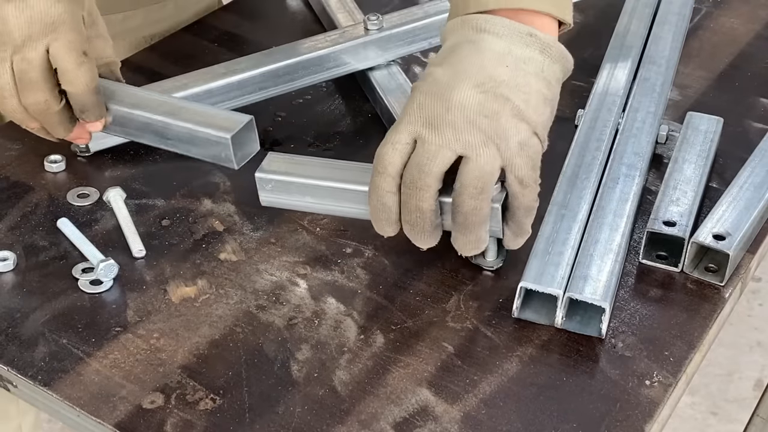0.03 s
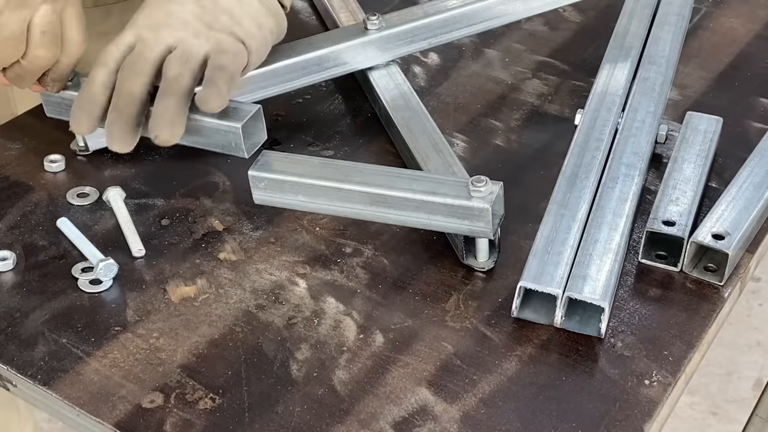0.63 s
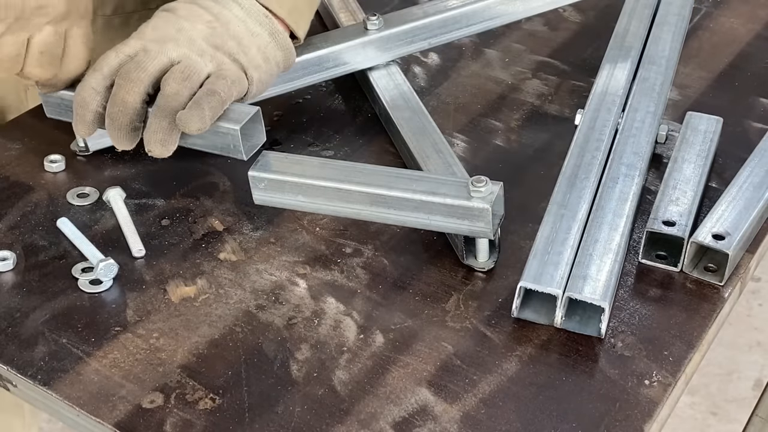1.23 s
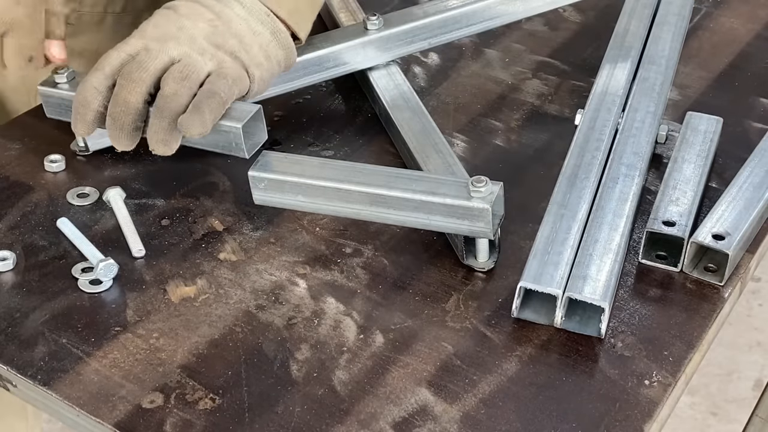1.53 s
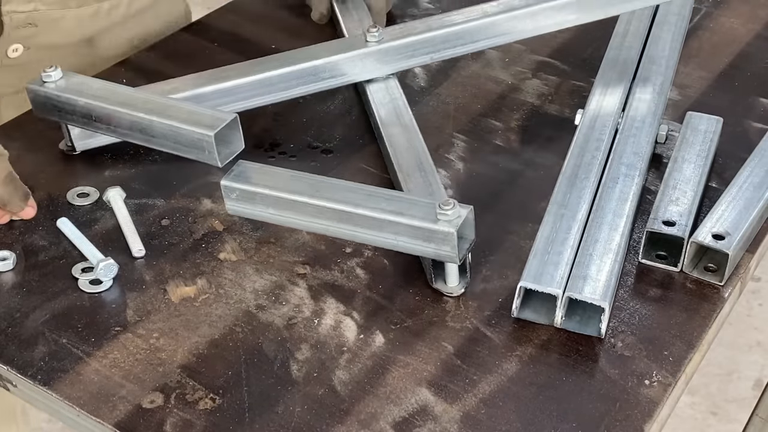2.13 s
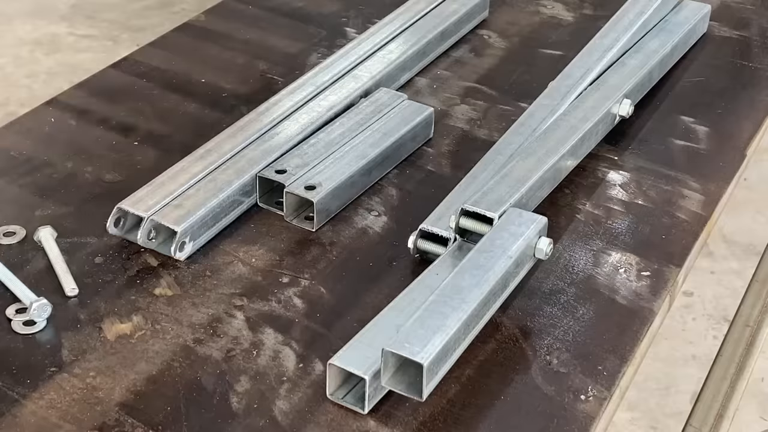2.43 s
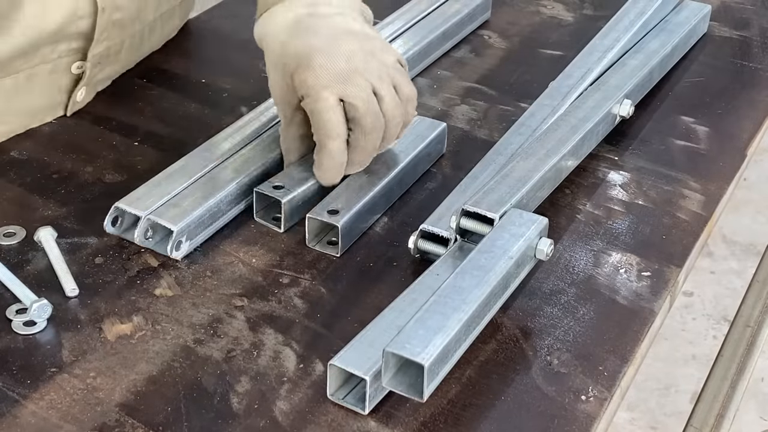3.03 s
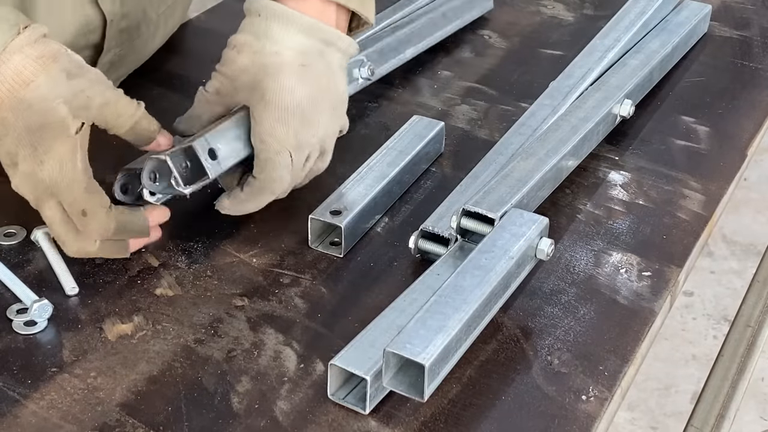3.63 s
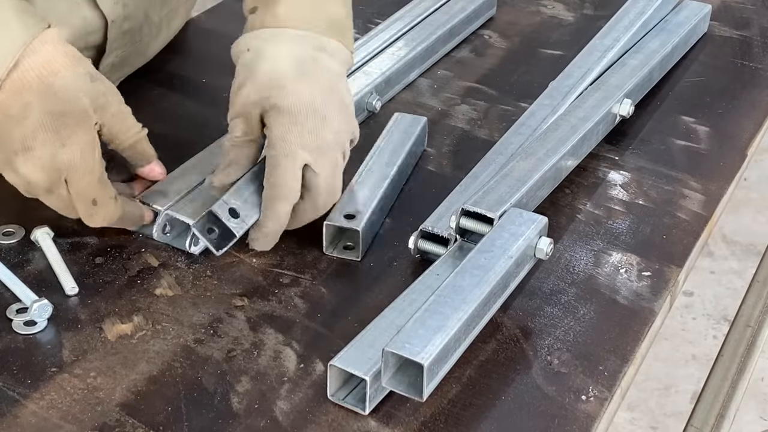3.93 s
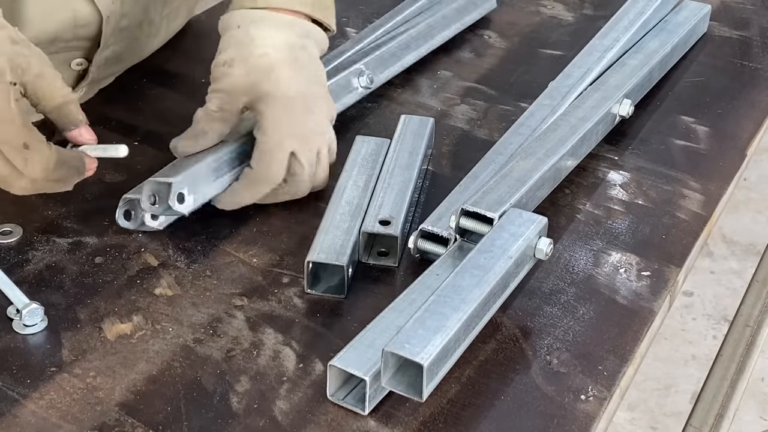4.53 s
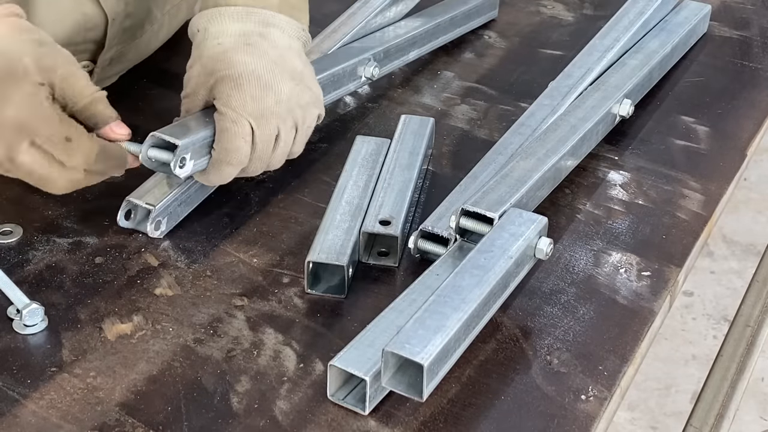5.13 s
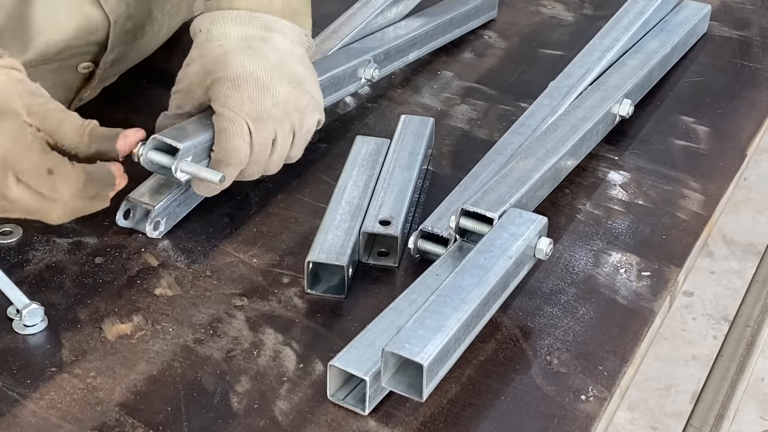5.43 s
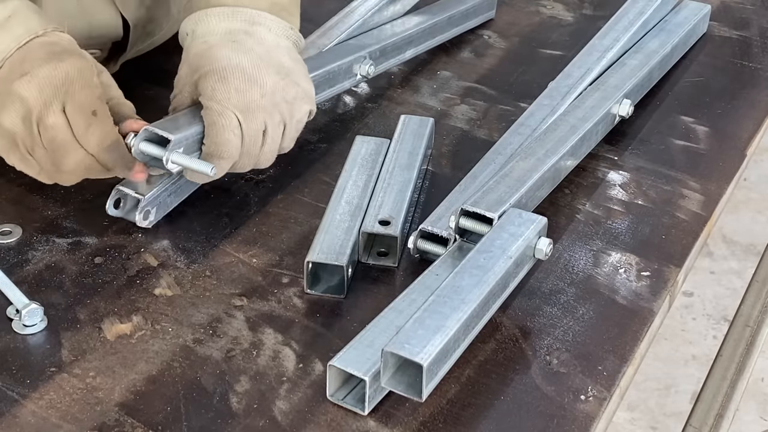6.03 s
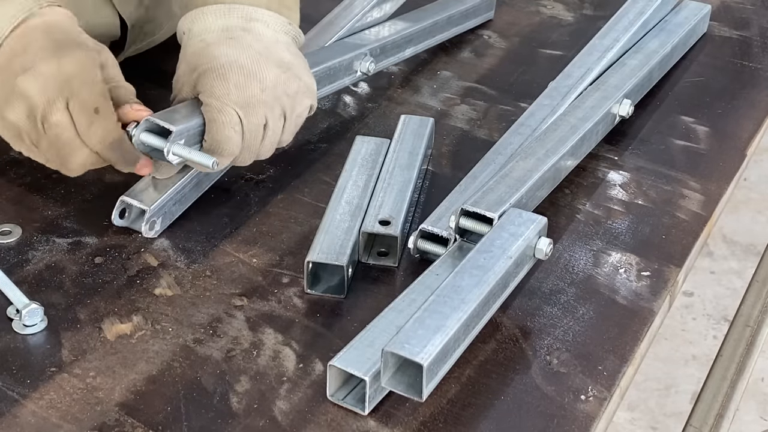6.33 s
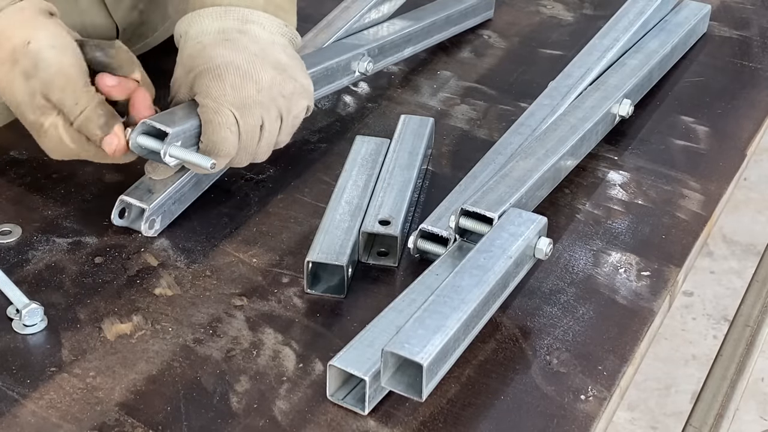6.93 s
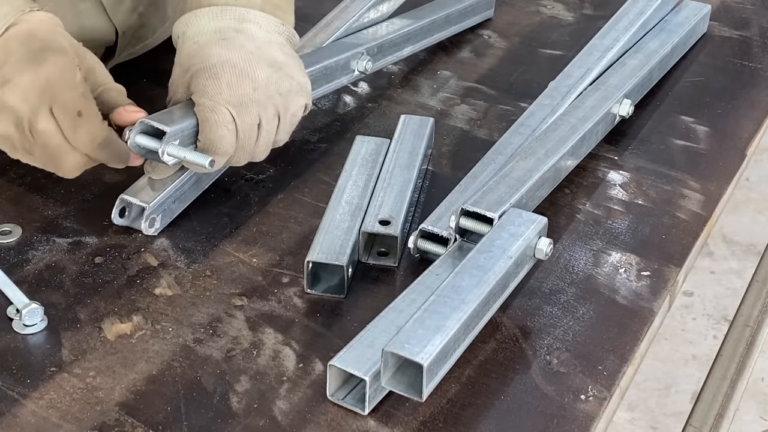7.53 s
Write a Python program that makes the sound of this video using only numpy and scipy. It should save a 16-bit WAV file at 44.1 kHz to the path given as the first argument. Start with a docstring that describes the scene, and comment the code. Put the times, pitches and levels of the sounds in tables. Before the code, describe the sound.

Steel parts are handled close by on a plywood workbench in a small workshop with a short echo. At the start a steel frame is set down with a knock and a low rub of gloves, then shifted with a faint, dull scrape around 2 seconds. Near 2.5 seconds the quiet background turns hissier and thinner in the bass. At about 3 seconds a short tube is dragged, sticking and slipping. It clinks against longer tubes from 3.3 to 3.6 seconds, both ringing briefly and brightly, and drops onto the bench with the loudest clatter at about 4 seconds. A few short scrapes follow. From 5 to 5.5 seconds a bolt ticks rapidly as it is worked through a hole. A light knock comes just after 6 seconds and a lone tick near 7. Throughout, gloves rub and nudge the work with soft bumps and swishes, growing quieter toward the end.

```python
"""Square steel tubes are handled close by on a plywood workbench in a small workshop.
First a folding frame is set down with a knock and shifted with a dull scrape. Near 2.5 s the scene cuts
to the tubes; the background turns hissier and thinner in the bass. A short tube is dragged, sticking
and slipping; it clinks on the long tubes so that both ring, and drops at 4 s. Then a bolt ticks as it
is worked through a hole. All along, gloves rub and nudge the work, with soft bumps and swishes."""
import sys
import numpy as np
from scipy import signal
from scipy.fft import rfft, irfft
from scipy.io import wavfile
from scipy.ndimage import uniform_filter1d

SR = 44100
rng = np.random.default_rng(int(sys.argv[2]) if len(sys.argv) > 2 else 0)


def put_to_file(sound):
    """Save the sound as 16-bit audio at rate SR, in the file named by the first command-line argument."""
    columns = np.atleast_2d(sound).T  # one column per channel
    safe = np.clip(columns, -1, 1)
    whole_steps = np.round(safe * 32767)
    wavfile.write(sys.argv[1], SR, whole_steps.astype(np.int16))


N = 342657

# Tone colours of the noises. Each row: frequency in Hz, relative level in dB.
AIR_SPECTRUM = [(200, -16.5), (450, 6), (1900, -4), (3500, -13), (10500, -18.5), (15000, -28)]
HISS_SPECTRUM = [(200, -41.5), (700, 7), (6000, -6), (15000, -15)]
FRAME_RUB_SPECTRUM = [(20, -29), (80, -6), (180, -2.5), (350, -4.5), (700, -24.5), (3000, -39),
                      (12000, -51)]
TUBE_RUB_SPECTRUM = [(30, -20), (200, 3), (750, 2.5), (1500, -4), (15000, -22)]
FRAME_SLIDE_SPECTRUM = [(150, -31.5), (320, -3), (560, -6), (3500, -19.5), (9500, -25), (15000, -36)]
TUBE_SLIDE_SPECTRUM = [(100, -77.5), (500, -10), (1050, 8), (1700, 6.5), (2400, 1), (4200, -8.5),
                       (7700, -14.5), (12000, -19.5)]
BENCH_KNOCK_SPECTRUM = [(200, -18), (420, -2.5), (800, 2), (2000, -7), (4000, -14), (9000, -27),
                        (15500, -34.5)]
STEEL_CLICK_SPECTRUM = [(200, -43), (700, -0.5), (2300, 2.5), (3400, 1.5), (4800, -7.5), (6000, -4.5),
                        (9300, -6.5), (14500, 0)]

# Modes, the tones that struck steel rings with. Each row: pitch in Hz, relative level in dB.
BOLT_MODES = [(2250, 3.4), (2590, 10), (3200, 3.9), (5830, 10), (6120, 10), (8200, 4.8)]
TUBE_ON_BENCH_MODES = [(826, 6), (1475, -5), (1810, 0), (2256, -2.5), (3150, -2.5), (3980, -1.5),
                       (4210, -6.5)]
SHORT_TUBE_MODES = [(5850, 0), (7480, 6.5), (11500, 7), (12320, -3), (13740, 6), (14480, -2), (15700, -4)]
LONG_TUBE_MODES = [(2110, 3.5), (2350, -2), (2800, -5.5), (6550, -14), (7320, 2.5), (8250, -7.5),
                   (12800, 0), (14100, -14), (14900, -11)]

# A glove takes hold of the work. Each row: start in seconds, length in seconds, relative level in dB.
GRIPS = [(0, 0.45, -52.5), (2.623, 0.09, -54.5), (3.357, 0.82, -52.5), (4.167, 0.47, -47),
         (4.663, 0.4, -53), (5.176, 0.32, -45.5), (6.193, 0.097, -51.5), (7.517, 0.059, -60)]
# Cloth and glove strokes. Each row: start in seconds, length in seconds, level in dB, centre in Hz.
SWISHES = [(0.507, 0.24, -69, 2530), (1.441, 0.079, -59, 3340), (2.501, 0.062, -54, 10600),
           (2.61, 0.2, -56.5, 11500), (2.807, 0.085, -51.5, 12900), (5.481, 0.26, -57.5, 4200),
           (6.224, 0.13, -53, 4050), (7.092, 0.13, -62.5, 13900), (7.294, 0.13, -62.5, 15000),
           (7.495, 0.17, -64.5, 14000)]
# Hands and steel bump the bench. Each row: time in seconds, level in dB, pitch in Hz.
BUMPS = [(.231, -26.5, 330), (.619, -46.5, 302), (0.65, -43, 220), (1.393, -38, 280), (1.707, -47, 252),
         (2.145, -36.5, 345), (2.51, -41, 860), (3.11, -26.5, 720), (3.789, -36, 607), (4.107, -23.5, 605),
         (4.49, -31.5, 655), (4.93, -33.5, 396), (5.269, -29, 347), (5.341, -26.5, 820),
         (5.429, -29.5, 660), (5.577, -36.5, 550), (5.642, -32, 816), (5.784, -39.5, 903),
         (6.067, -43, 566), (6.203, -31, 740), (6.319, -43, 842), (6.437, -49, 760), (6.609, -49.5, 198),
         (6.617, -46, 697), (6.84, -45, 635), (7.588, -41.5, 820)]
# Steel slides on the bench or on steel.
# Each row: start in seconds, length in seconds, level in dB, tilt in dB per octave (more is brighter).
SCRAPES = [(0.005, 0.22, -50.5, 0), (1.964, 0.041, -53.5, 1.5), (2.068, 0.14, -49, -1.5),
           (2.19, 0.14, -50.5, 0.5), (2.956, 0.14, -37.5, 1.5), (3.09, 0.046, -33.5, 2),
           (3.136, 0.13, -45, 2.5), (3.984, 0.082, -32.5, 4.5), (4.18, 0.044, -35.5, 0.5),
           (4.356, 0.096, -42, -2), (4.536, 0.076, -43, 1), (4.737, 0.049, -44.5, 1),
           (5.221, 0.13, -47.5, 4.5)]
# Small steel ticks: a light clink of tube on tube, then the bolt catching in its hole.
# Each row: start in seconds, level in dB.
TICKS = [(3.511, -43), (4.488, -49.5), (4.544, -40), (4.807, -41.5), (4.935, -41.5), (5.0443, -33.5),
         (5.058, -35), (5.081, -36.5), (5.1051, -30.5), (5.127, -27), (5.1306, -32.5), (5.1351, -31),
         (5.142, -27), (5.233, -40.5), (5.2559, -33), (5.265, -35.5), (5.283, -38), (5.324, -40),
         (5.331, -34), (5.374, -36), (5.409, -43), (5.4452, -27.5), (5.453, -27), (5.854, -37),
         (6.946, -38)]
# Steel lands on the bench.
# Each row: start in seconds, level in dB, tilt in dB per octave, seconds to fade by 60 dB (called t60).
KNOCKS = [(0.1159, -25, 1, 0.077), (0.256, -29, 2, 0.12), (3.832, -33, 3.5, 0.13), (3.9061, -25, 2.5, 0.1),
          (4.0132, -17, 0.65, 0.082), (4.094, -27, 5, 0.12), (4.1011, -13.5, 3, 0.027),
          (4.107, -22, 6, 0.13), (4.521, -30, 4, 0.058), (6.1492, -31, 3.5, 0.12)]
# Tube hits tube. Each row: start in seconds, click level in dB, short tube level in dB,
# long tube level in dB, pitch of the tube wall in Hz, its level in dB.
CLINKS = [(3.261, -34, -57, -61, 14000, -47), (3.286, -26.5, -30.5, -23, 5650, -13.5),
          (3.414, -29.5, -47, -26, 5690, -28), (3.586, -33.5, -35.5, -40, 5850, -28.5),
          (4.074, -31, -39, -50, 14300, -42), (4.187, -30, -43, -31, 14400, -33),
          (4.269, -37.5, -37, -42, 14560, -30)]

SCENE_CUT_S, BOLT_SEATED_S = 2.48, 5.5  # the scene cuts to the tubes; later the bolt sits tight
TREBLE_LIMIT_HZ = 16000
EVENT_SAMPLES = 16384  # room for one short sound


def amp(db):
    """Turns decibels into a gain to multiply by."""
    return 10 ** (np.asarray(db) / 20)


def unit_level(x):
    """Scales x to an average (rms) level of 1."""
    return x / np.sqrt(np.mean(x ** 2) + 1e-20)


def add(mix, start_s, sound):
    """Mixes a sound into both channels at the given time."""
    part = mix[:, max(round(start_s * SR), 0):][:, :sound.shape[1]]
    part += sound[:, :part.shape[1]]


def noise(size, alike):
    """White noise whose left and right sides are unrelated (alike=0) up to identical (alike=1)."""
    mid, side = rng.standard_normal((2, size))
    return np.sqrt((1 + alike) / 2) * mid + np.sqrt((1 - alike) / 2) * np.array([side, -side])


def colour(x, spectrum, tilt_db=0):
    """Gives x a tone colour, tilted by tilt_db per octave, at an average level of 1."""
    octave = np.log2(np.arange(x.shape[1] // 2 + 1) * SR / x.shape[1] + 1)
    hz, db = np.transpose(spectrum)
    gain = amp(np.interp(octave, np.log2(hz), db) + tilt_db * octave)
    return unit_level(irfft(rfft(x) * gain, x.shape[1]))


def die_away(x, t60, slope):
    """Fades x in four bands. t60 holds at 1 kHz; a slope above 0 lets the bass last longer."""
    t = np.arange(x.shape[1]) / SR
    hz = np.arange(x.shape[1] // 2 + 1) * SR / x.shape[1]
    centres_khz = np.array([.25, 1, 4, 16])
    place = np.interp(np.log(hz / 1000 + 1e-6), np.log(centres_khz), np.arange(4))
    spectrum = rfft(x)
    bands = [irfft(spectrum * np.maximum(1 - abs(place - k), 0)) for k in range(4)]
    return sum(band * 1e-3 ** (t / t60 * khz ** slope) for band, khz in zip(bands, centres_khz))


def wobble(size, per_s):
    """A random curve that wanders mostly between -1 and 1."""
    return np.interp(np.arange(size) * per_s / SR, np.arange(4096), rng.standard_normal(4096))


def ring(modes, t60, spread=.004):
    """Struck steel rings. Each mode is two close tones; the grip shifts pitch and level by chance."""
    t = np.arange(EVENT_SAMPLES) / SR
    hz, db = np.transpose(modes + modes)[:, :, None]
    luck, side, phase, detune = rng.standard_normal((4, len(hz), 1))
    hz = hz * (1 + spread * detune)
    height = amp(db + 2 * luck)
    height /= np.sqrt(np.sum(height ** 2) / 2)
    tones = height * np.sin(2 * np.pi * (hz * t + phase)) * 1e-3 ** (t / t60)
    pan = np.exp(.35 * side)
    return np.array([(tones * pan).sum(0), (tones / pan).sum(0)]) * (1 - np.exp(-t / 0.00093))


def blow(spectrum, tilt_db, t60, slope, crack):
    """A sharp crack, then a struck body's many tones die quickly. It gives off no deep bass."""
    t = np.arange(EVENT_SAMPLES) / SR
    body = die_away(colour(noise(EVENT_SAMPLES, 0.79), spectrum, tilt_db), t60, slope)
    attack = (1 + crack * np.exp(-t / 0.00027)) * (1 - np.exp(-t / 0.000067))
    low_cut = signal.butter(3, 280, "high", fs=SR, output="sos")
    return signal.sosfilt(low_cut, body * attack)


def air():
    """Quiet workshop air; it turns hissier when the scene cuts to the tubes."""
    hiss = colour(noise(N, 0.44), HISS_SPECTRUM) * (np.arange(N) > SCENE_CUT_S * SR)
    return amp(-65.5) * colour(noise(N, 0.072), AIR_SPECTRUM) + amp(-63) * hiss


def wall_echo(x, echo_db=-15):
    """The workshop walls add a short, blurred echo to x."""
    fade_in = np.minimum(np.arange(EVENT_SAMPLES) / SR / .015, 1)
    tail = die_away(noise(EVENT_SAMPLES, .4), t60=.3, slope=.5) * fade_in
    return x + amp(echo_db) * signal.oaconvolve(x, tail / np.linalg.norm(tail[0]), axes=1)[:, :N]


def grip_force(t, attack_s=0.016, release_s=0.034):
    """Pressure of the hands: every grip tightens, holds and lets go."""
    force = np.zeros_like(t)
    for start, length, db in GRIPS:
        tighten = np.clip((t - start) / attack_s, 0, 1)
        let_go = np.exp(-np.maximum(t - start - length, 0) / release_s)
        force = np.maximum(force, amp(db) * tighten * let_go)
    return force


def nudges(low_hz, high_hz, per_mode_per_s=1.5, modes=24, size=2048):
    """Tiny padded touches, each a few swings of one of the board's low modes."""
    t, out = (np.arange(size) - size / 2) / SR, np.zeros(N)
    for hz in np.geomspace(low_hz, high_hz, modes):
        touches = (rng.random(N) < per_mode_per_s / SR) * rng.uniform(.3, 1, N)
        pulse = np.exp(-(t * hz / 1.1) ** 2) * np.sin(2 * np.pi * hz * t)
        out += signal.oaconvolve(touches, pulse, "same")
    return unit_level(out)


def gloves(lumpy_db=4):
    """Resting fingers only nudge the work; a grip also rubs it. The frame sounds deeper than a tube."""
    t = np.arange(N) / SR
    lumps = amp(lumpy_db * np.minimum(wobble(N, per_s=90), 2))
    grip = grip_force(t)
    resting_on_frame, resting_on_tube = amp(-69.5), amp(-67)
    frame = grip * amp(5.5) * colour(noise(N, 0) * lumps, FRAME_RUB_SPECTRUM)
    frame += (grip + resting_on_frame) * nudges(155, 460)
    tube = grip * colour(noise(N, 0.73) * lumps, TUBE_RUB_SPECTRUM)
    tube += (grip + resting_on_tube) * amp(-4.5) * nudges(398, 1130)
    return np.where(t < SCENE_CUT_S, frame, tube)


def swishes():
    """Cloth slides over smooth steel: a soft hiss swells and fades."""
    out, t = np.zeros((2, N)), np.arange(EVENT_SAMPLES) / SR
    for start, length, db, hz in SWISHES:
        stroke = np.sin(np.pi * np.minimum(t / length, 1))
        flutter = amp(3.5 * np.minimum(wobble(EVENT_SAMPLES, per_s=45), 1))
        hiss = colour(noise(EVENT_SAMPLES, 0.64), [(1500, -11), (hz, 0), (hz * 2, -24)])
        add(out, start, amp(db) * stroke * flutter * hiss)
    return out


def bumps(cycles=1.05, rebound_cycles=2.39, rebound_db=-6.5, size=4096):
    """A padded blow swings the board only a few times, and a weaker rebound follows."""
    out, t = np.zeros((2, N)), (np.arange(size) - size / 2) / SR
    for time, db, hz in BUMPS:
        for delay, gain in ((0, amp(db)), (rebound_cycles / hz, amp(db + rebound_db))):
            push = np.exp(-(t * hz / cycles) ** 2) * np.sin(2 * np.pi * (hz * t + rng.random()))
            add(out, time + delay + t[0], gain * push[None])
    return out


def scrapes(rough_db=3.5, slips_per_s=250):
    """Sliding steel sticks and slips. The heavy frame drags dully; a loose tube is brighter and sings."""
    out, t = np.zeros((2, N)), np.arange(EVENT_SAMPLES) / SR
    for start, length, db, tilt_db in SCRAPES:
        progress = np.sqrt(np.minimum(t / length, 1))
        stroke = np.sin(np.pi * progress * (1 + progress) / 2)  # gathers speed, then slows to a stop
        is_tube = start > SCENE_CUT_S
        spectrum = TUBE_SLIDE_SPECTRUM if is_tube else FRAME_SLIDE_SPECTRUM
        rub = colour(noise(EVENT_SAMPLES, 0.72), spectrum, tilt_db) * stroke
        rub *= unit_level(amp(rough_db * np.minimum(wobble(EVENT_SAMPLES, slips_per_s), 1)))
        steel = ring(TUBE_ON_BENCH_MODES + SHORT_TUBE_MODES, t60=0.031)
        song = unit_level(signal.fftconvolve(rub, steel, axes=1)[:, :EVENT_SAMPLES])
        add(out, start, amp(db) * (rub + is_tube * amp(-4) * rub.std() * song))
    return out


def steel_ticks():
    """A light tube clink, then bolt threads catching in a hole. A seated bolt no longer rings."""
    out = np.zeros((2, N))
    for start, db in TICKS:
        steel = amp(-5) * ring(BOLT_MODES, t60=.07, spread=.03)
        click = blow(STEEL_CLICK_SPECTRUM, tilt_db=rng.uniform(-1, 1), t60=.06, slope=0, crack=1)
        add(out, start, amp(db) * (click + steel * (start < BOLT_SEATED_S)))
    return out


def knocks():
    """Steel lands on the bench: the board and the steel lying on it clatter together."""
    out = np.zeros((2, N))
    for start, db, tilt_db, t60 in KNOCKS:
        steel = amp(-8) * ring(TUBE_ON_BENCH_MODES, t60)
        board = blow(BENCH_KNOCK_SPECTRUM, tilt_db, t60, slope=0.0023, crack=0.07)
        add(out, start, amp(db) * (board + steel))
    return out


def tube_wall_tone(hz, t60=.068, beat_hz=65, after_t60=.26):
    """A tube's flat walls sing two close tones, roughened by the touching tubes; a thin ring lingers."""
    t = np.arange(EVENT_SAMPLES) / SR
    phase = 2 * np.pi * hz * t + .4 * wobble(EVENT_SAMPLES, per_s=700)
    pair = np.sin(phase) + .4 * np.sin(phase + 2 * np.pi * beat_hz * t)
    after_ring = amp(-19) * (hz / TREBLE_LIMIT_HZ) ** 2 * 1e-3 ** (t / after_t60)
    fade = 1e-3 ** (t / t60) + after_ring
    return pair * fade * (1 - np.exp(-t / 0.00049))


def clinks():
    """Tube meets tube: a click, and both ring. The pitch of the wall tone shifts with the grip."""
    out = np.zeros((2, N))
    for start, click_db, short_db, long_db, wall_hz, wall_db in CLINKS:
        click = amp(click_db) * blow(STEEL_CLICK_SPECTRUM, tilt_db=0, t60=.08, slope=0, crack=1)
        short_tube = amp(short_db) * ring(SHORT_TUBE_MODES, t60=.095)
        long_tube = amp(long_db) * ring(LONG_TUBE_MODES, t60=.075, spread=.012)
        add(out, start, click + short_tube + long_tube + amp(wall_db) * tube_wall_tone(wall_hz))
    return out


def bass_gate(x):
    """A rumble suppressor turns weak bass down; the deeper the bass, the louder it must be to pass."""
    hz, t, bands = signal.stft(x, SR, nperseg=1024, noverlap=768)
    power = uniform_filter1d(np.mean(abs(bands) ** 2, 0), size=9, axis=0)
    level_db = 10 * np.log10(power + 1e-18)
    octave = np.log2((hz + 1) / 250)[:, None]
    threshold_db = -68 - 6 * octave
    bass_only = np.clip(1 - octave, 0, 1) ** 2
    strength = np.where(t < SCENE_CUT_S, .12, 1)  # the bass is thinner after the scene cuts
    cut_db = np.clip(2 * (threshold_db - level_db), 0, 35) * bass_only * strength
    return signal.istft(bands * amp(-cut_db), SR, nperseg=1024, noverlap=768)[1][:, :N]


def scene():
    """The handling with its echo, plus the gloves and the room air."""
    handling = knocks() + clinks() + steel_ticks() + scrapes() + bumps() + swishes()
    return wall_echo(handling) + gloves() + air()


def record(dry):
    """Turns down weak rumble, then cuts the highest treble."""
    low_pass = signal.firwin(511, TREBLE_LIMIT_HZ, window=("kaiser", 9), fs=SR)
    return signal.oaconvolve(bass_gate(dry), low_pass[None], "same")


dry = scene()
out = record(dry)
put_to_file(out)
```